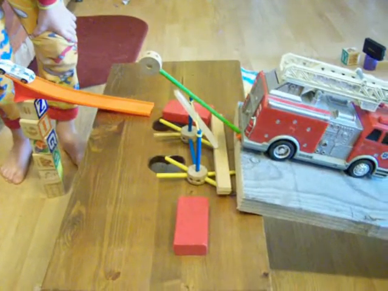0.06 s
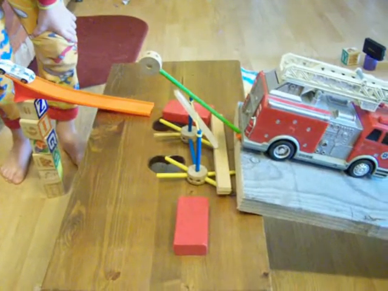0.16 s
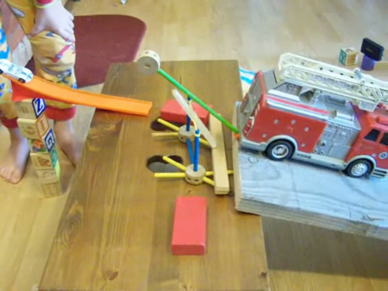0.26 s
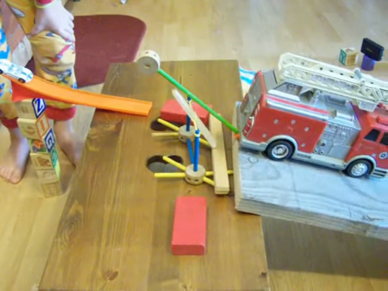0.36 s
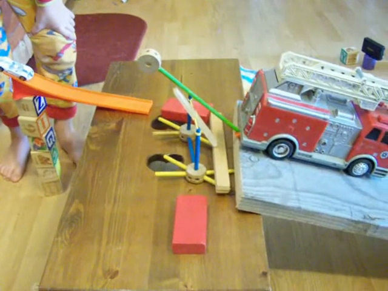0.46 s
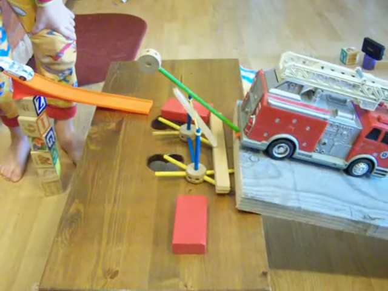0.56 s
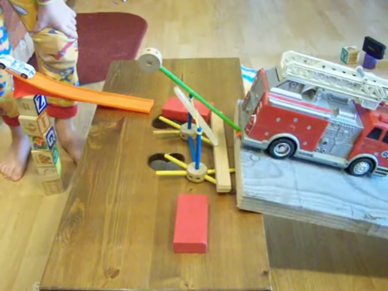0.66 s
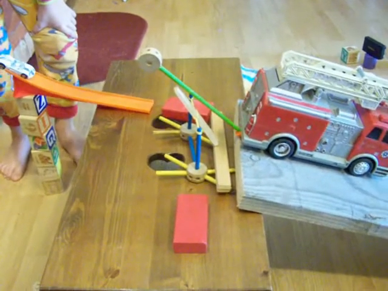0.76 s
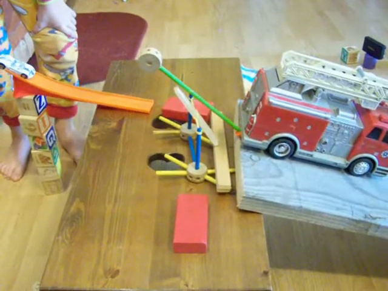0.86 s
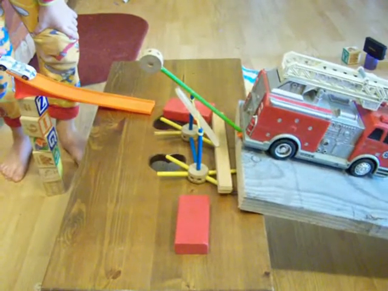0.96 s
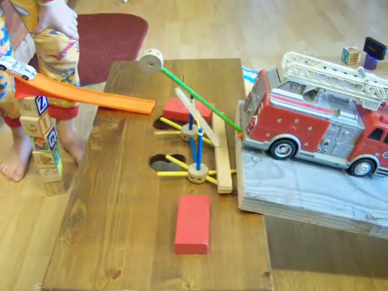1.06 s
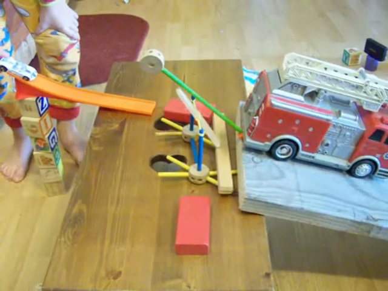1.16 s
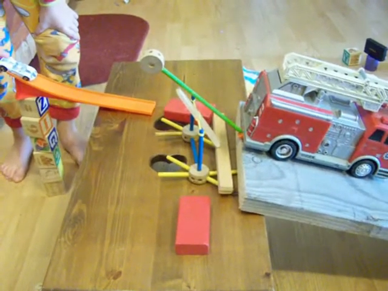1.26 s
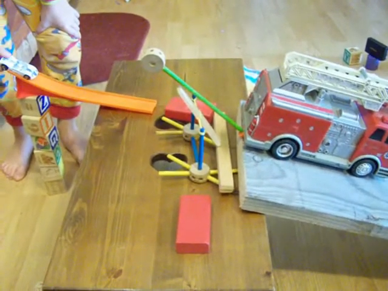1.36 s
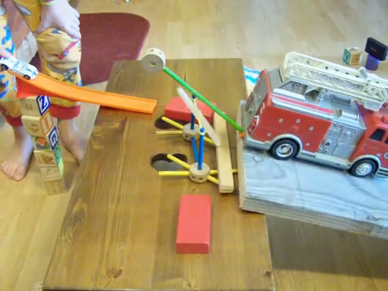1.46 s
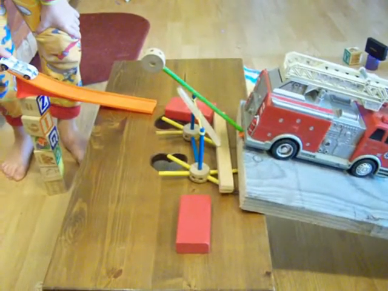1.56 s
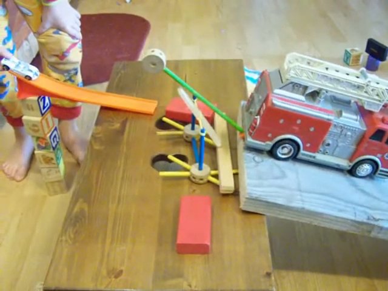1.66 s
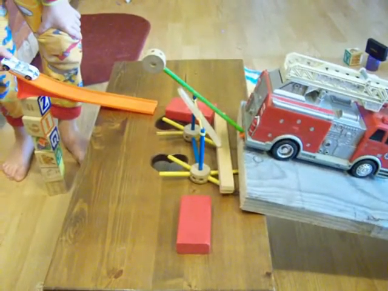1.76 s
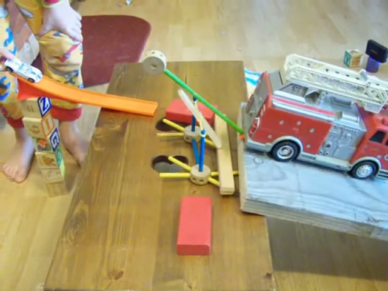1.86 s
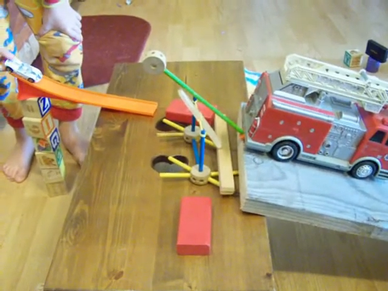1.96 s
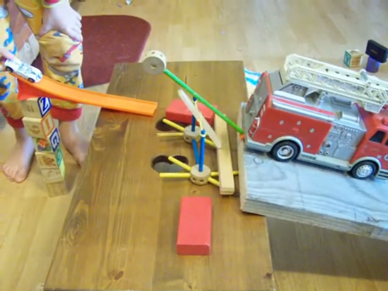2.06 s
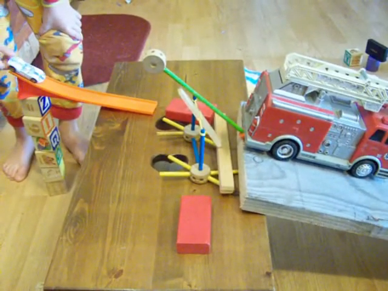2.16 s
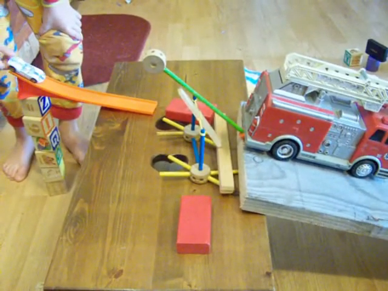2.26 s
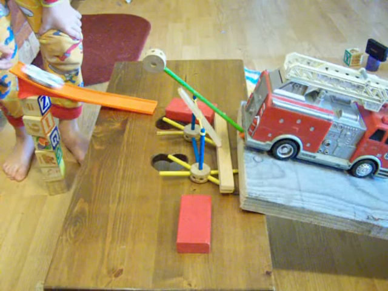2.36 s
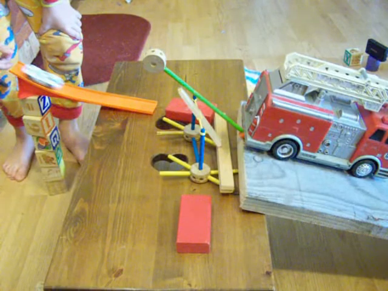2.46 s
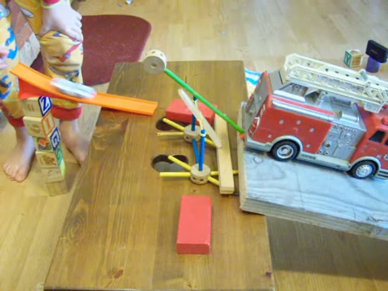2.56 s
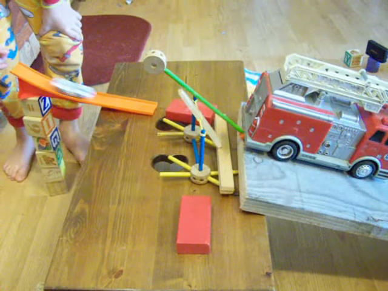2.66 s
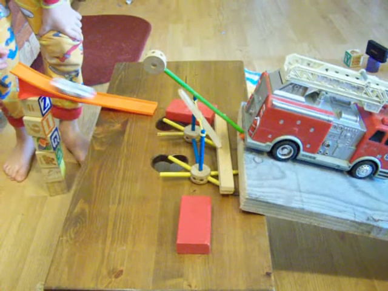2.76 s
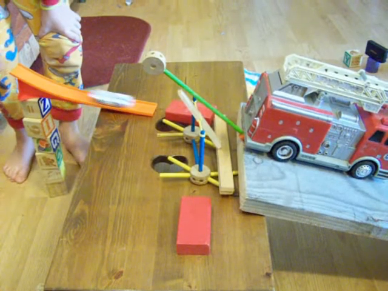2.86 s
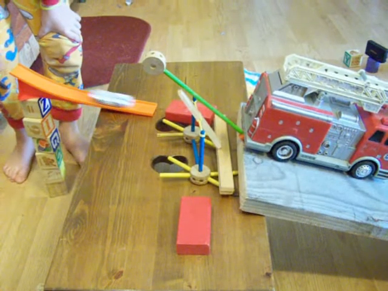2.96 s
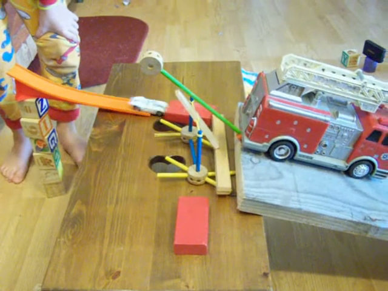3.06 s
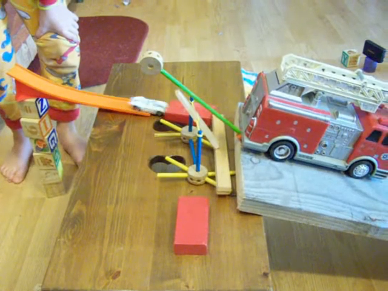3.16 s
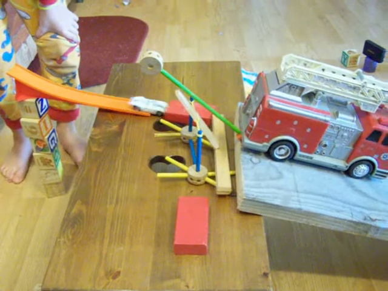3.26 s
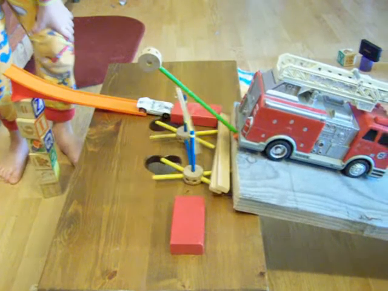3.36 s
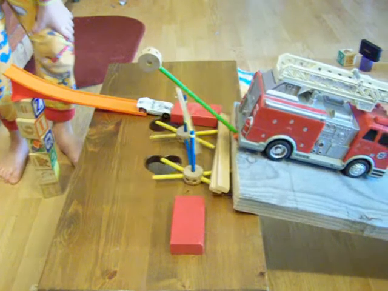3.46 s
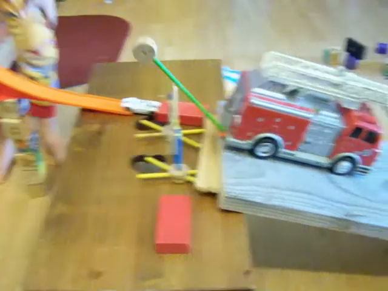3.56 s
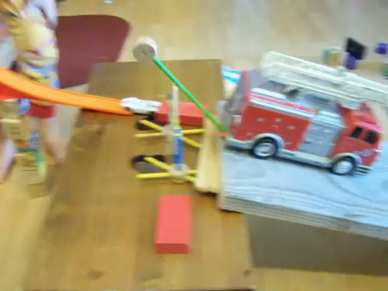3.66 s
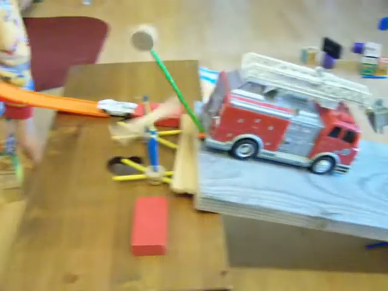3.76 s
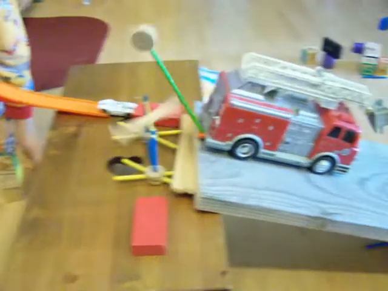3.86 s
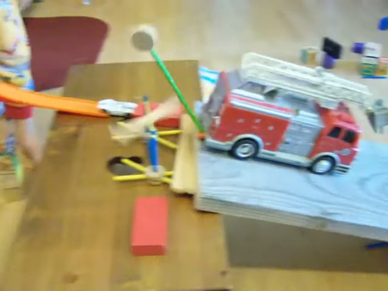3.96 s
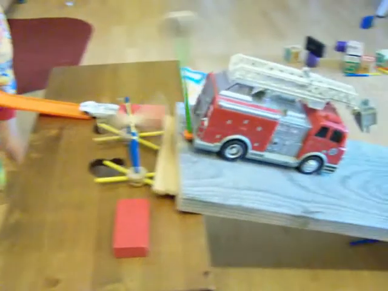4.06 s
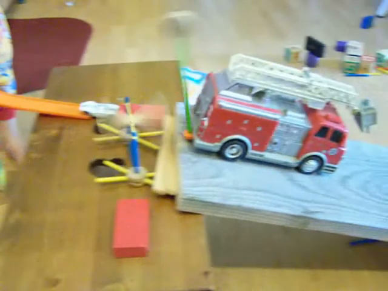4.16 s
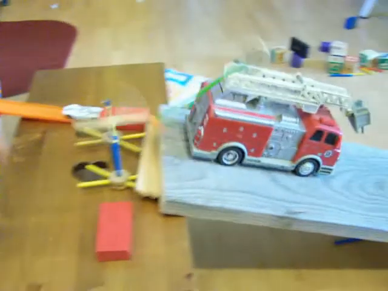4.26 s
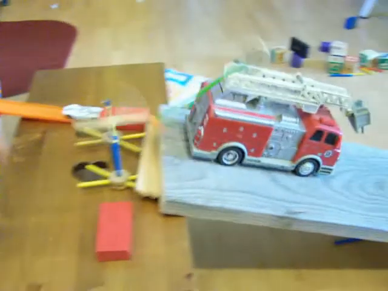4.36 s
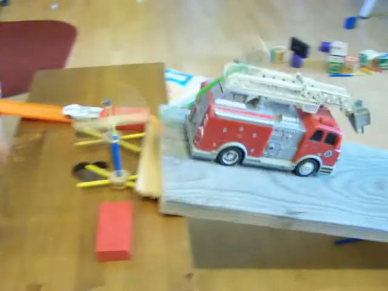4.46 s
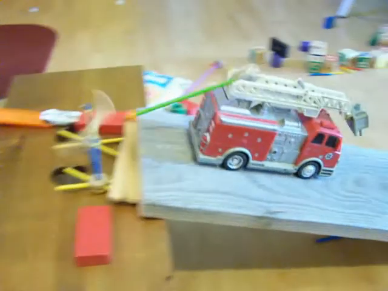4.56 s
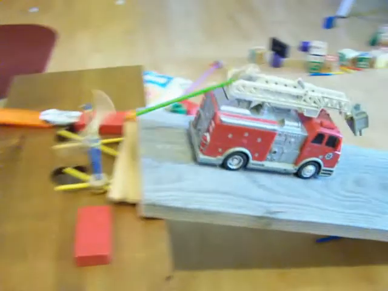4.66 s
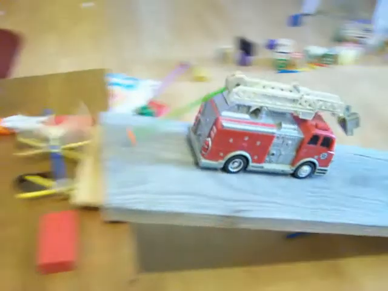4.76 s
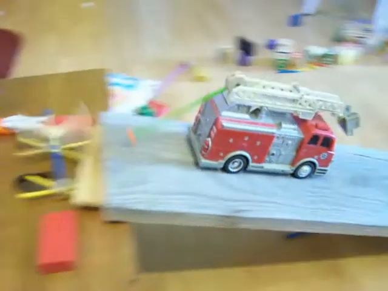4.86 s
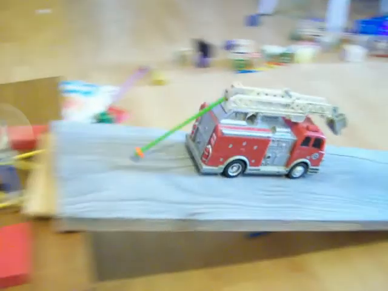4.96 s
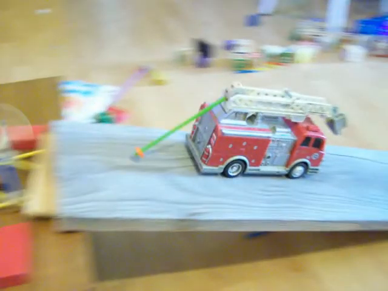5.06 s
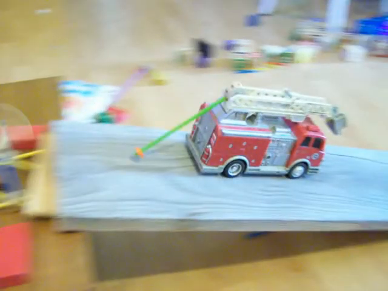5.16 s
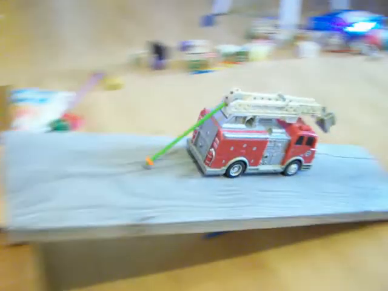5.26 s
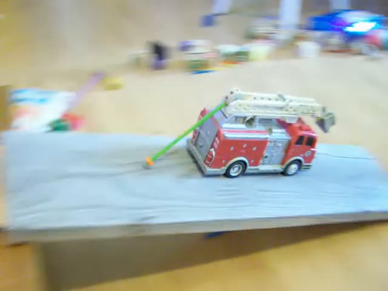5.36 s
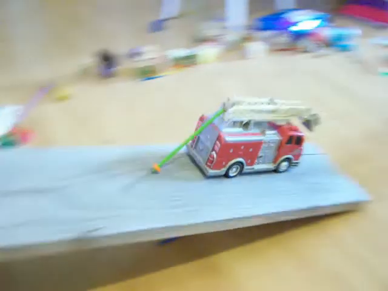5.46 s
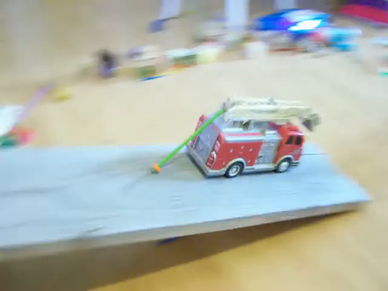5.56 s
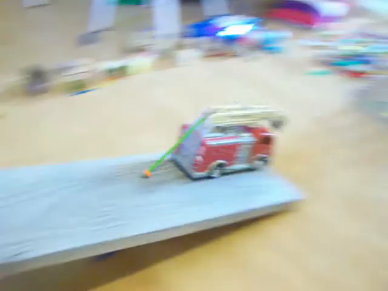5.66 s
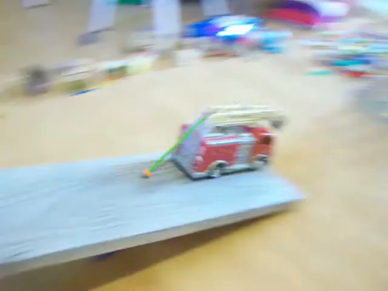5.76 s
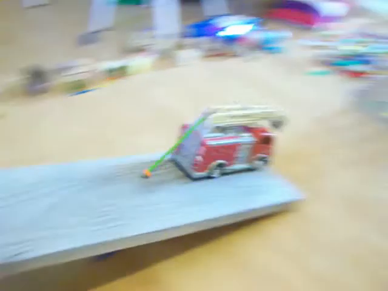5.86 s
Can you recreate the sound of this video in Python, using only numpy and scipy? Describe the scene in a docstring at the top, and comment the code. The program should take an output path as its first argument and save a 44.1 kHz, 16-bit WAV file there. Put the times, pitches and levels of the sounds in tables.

```python
"""Toys on a track, a table and a board

A quiet room with a low rumble and one hand-held recorder, its microphone hearing much more toy than room.
A toy car runs down a plastic track, knocks into a wooden block and slides out on the table; a stick spinner
trips, and a toy truck rattles down a wooden board. Random blows and clattering knocks shake ringing bodies.
The recorder keeps 6400 samples a second and joins them by straight lines: sounds are mirrored into the treble."""
import sys
import numpy as np
from scipy import signal
from scipy.fft import rfft, irfft
from scipy.io import wavfile
from scipy.ndimage import uniform_filter1d

SR = 44100
rng = np.random.default_rng(int(sys.argv[2]) if len(sys.argv) > 2 else 0)


def dump_mix(stems):
    """Bounce the given channels to the path in sys.argv[1] as a 16-bit WAV at rate SR."""
    frames = np.atleast_2d(stems).T  # one column per channel
    limited = np.clip(frames, -1, 1)  # hard clip at full scale
    pcm = np.round(limited * 32767).astype(np.int16)
    wavfile.write(sys.argv[1], SR, pcm)


N = 260618


def amp(db):
    """Gain of a level in dB."""
    return 10 ** (np.asarray(db) / 20)


def rms_one(x):
    """Signal scaled to rms 1."""
    return x / np.sqrt(np.mean(x ** 2) + 1e-20)


def add_at(out, s, sound):
    """Mix a sound into out from second s, cut off at the end."""
    at = round(s * SR)
    out[at:at + len(sound)] += sound[:N - at]


def levels(rows):
    """Gain curves of each dB column, straight in dB between rows, silent outside the table."""
    s, *columns = np.transpose(rows)
    t = np.arange(N) / SR
    inside = ((t > s[0]) & (t < s[-1])) * 1.
    inside = uniform_filter1d(inside, size=90)   # 2 ms edges avoid clicks
    return [inside * amp(np.interp(t, s, column)) for column in columns]


def ramp(start_s, end_s, start_db, db_per_s, hold_s=0.):
    """Gain that holds, then changes by a steady number of dB a second."""
    hold_end_s = start_s + hold_s
    end_db = start_db + db_per_s * (end_s - hold_end_s)
    return levels([(start_s, start_db), (hold_end_s, start_db), (end_s, end_db)])[0]


def drift(rate_hz):
    """Slow random wander of rms 1: noise through two equal one-pole lowpasses."""
    r = np.exp(-2 * np.pi * rate_hz / SR)
    slow = signal.lfilter([1], [1, -2 * r, r * r], rng.standard_normal(N + SR))
    return rms_one(slow[SR:])   # the first second lets the filter settle


def resonance(x, hz, width_hz):
    """Two-pole resonance with gain 1 on top; a narrower one rings longer."""
    r = np.exp(-np.pi * width_hz / SR)
    top = (1 - r * r) / 2
    return signal.lfilter([top, 0, -top], [1, -2 * r * np.cos(2 * np.pi * hz / SR), r * r], x)


def body(force, modes):
    """A solid body as resonances in parallel, signs alternating."""
    return sum((-1) ** k * amp(db) * resonance(force, hz, width_hz)
               for k, (hz, width_hz, db) in enumerate(modes))


def rolling(gain, modes, per_s, spread_db, bumpy_db, shift_db):
    """Moving contact meets grit and grain at random: uneven tiny blows, clumped by bumps, shake the body."""
    sizes = amp(spread_db * np.minimum(rng.exponential(1, N), 4)) * rng.choice([-1, 1], N)
    hits = rng.random(N) < per_s / SR
    blows = sizes * hits * amp(bumpy_db * drift(35)) + 1e-18
    on = np.flatnonzero(gain)
    near = slice(on[0], min(on[-1] + SR // 4, N))   # a quarter second more for the ring to die
    out, wander = np.zeros(N), drift(7.0)
    for k, mode in enumerate(modes):
        # the contact point wanders, so each resonance is driven now harder, now softer
        push = amp(shift_db * np.roll(wander, k * SR // 3))
        force = blows * gain * push + 1e-18
        out[near] += (-1) ** k * body(force[near], [mode])
    steady_rms = np.sqrt(np.mean(body(blows, modes) ** 2))
    return out / steady_rms


def knocks(rows, modes, clatter_s, ring_db, ring_width_hz, contact_hz):
    """Each knock is a dying clatter of contacts into the body, its own strongest ring and a low thud."""
    out, t = np.zeros(N), np.arange(SR // 6) / SR
    soft = np.exp(-2 * np.pi * contact_hz / SR)
    for s, peak_db, hz, thud_db in rows:
        force = rng.standard_normal(len(t)) * np.exp(-t / clatter_s)
        force[0] += 0.77 * np.sign(force[0])   # the first contact is harder
        # a yielding contact dulls the blow
        force = signal.lfilter([1], [1, -2 * soft, soft * soft], force)
        sound = rms_one(body(force, modes))
        sound += amp(ring_db) * rms_one(resonance(force, hz, ring_width_hz))
        sound += amp(thud_db) * rms_one(resonance(force, 637, 460))
        add_at(out, s, amp(peak_db) * sound / np.abs(sound).max())
    return out


def buzzes(rows, sag_per_s):
    """A narrow band of noise around a sinking pitch; quick start, soft end."""
    out = np.zeros(N)
    for s, length_s, level_db, hz, width_hz in rows:
        u = np.arange(round(length_s * 1.4 * SR)) / (length_s * SR)   # time in lengths
        r = np.exp(-np.pi * width_hz / SR)
        steady = 70 / width_hz   # the narrower the buzz, the more of it is a held tone
        wobble = signal.lfilter([1], [1, -r], rng.standard_normal((2, SR // 2)))
        wobble = wobble[:, -len(u):] * np.sqrt(1 - r * r)
        phase = 2 * np.pi * np.cumsum(hz * (1 - sag_per_s * u * length_s)) / SR
        tone = (steady + wobble[0]) * np.sin(phase) + wobble[1] * np.cos(phase)
        shape = np.clip(u * length_s / 0.0015, 0, 1) * np.clip((1.4 - u) / 0.57, 0, 1)
        add_at(out, s, amp(level_db) * shape * rms_one(tone))
    return out


# colour of the air in the room, relative: (frequency [Hz], density [dB per Hz])
AIR_COLOUR = [(12, -48), (20, -17.5), (87, -2.5), (112, -5), (150, -8), (216, -16), (245, -14.5),
              (359, -23), (383, -19.5), (494, -25.5), (624, -27), (771, -27), (1180, -28), (1280, -25.5),
              (3200, -37), (4160, -70), (7040, -120)]
# low bumps of the hand-held recorder: (time [s], level at the crest [dB])
HAND_BUMPS = [(2.71, -39), (3.89, -36), (4.15, -33), (4.45, -34), (5.03, -28), (5.43, -29)]


def room_tone():
    """Ventilation rumble and hiss, a faint whine, and low-band noise where hands bump the recorder."""
    hz = np.maximum(np.fft.rfftfreq(N, 1 / SR), 1)
    colour_hz, colour_db = np.transpose(AIR_COLOUR)
    colour = amp(np.interp(np.log(hz), np.log(colour_hz), colour_db))
    air = amp(-39.5) * rms_one(irfft(rfft(rng.standard_normal(N)) * colour, N))
    whine = amp(-61) * rms_one(resonance(rng.standard_normal(N), 1235, 9.1))
    low_band = signal.butter(2, [25, 100], "band", fs=SR, output="sos")
    low = rms_one(signal.sosfilt(low_band, rng.standard_normal(N)))
    t = np.arange(N) / SR
    hands = sum(amp(db - 148 * np.abs(t - s)) for s, db in HAND_BUMPS)   # 148 dB/s on both sides
    return air + whine + hands * low


# resonances of the plastic track: (frequency [Hz], width [Hz], relative level [dB])
TRACK_MODES = [(597, 188, -6), (856, 200, -9.5), (1100, 130, -6.5), (1310, 110, -1.5), (1455, 140, 0),
               (1790, 250, -2.5), (2065, 240, -7.5), (2380, 300, -16.5), (2880, 190, -19.5)]
# car knocking on the track: (time [s], peak [dB], strongest ring [Hz], thud against body sound [dB])
CAR_HITS = [(1.287, -41, 2000, -20), (1.759, -25, 1360, 0), (1.785, -32, 1300, -11),
            (2.072, -17, 1370, -23), (2.15, -21, 1970, -20), (2.259, -24.5, 2300, -12),
            (2.39, -21, 2360, -20)]


def car():
    """Knocks and wheels shake the plastic track; the wheels swell as the car gathers speed."""
    wheels = ramp(start_s=2.076, end_s=2.7, start_db=-30, db_per_s=6)
    out = rolling(wheels, TRACK_MODES, per_s=1600., spread_db=-0.5, bumpy_db=2.0, shift_db=2.5)
    return out + knocks(CAR_HITS, TRACK_MODES, clatter_s=0.0083, ring_db=9.0, ring_width_hz=210, contact_hz=3500)


# whine of a car wheel: (time [s], length [s], level [dB], pitch [Hz], width [Hz])
WHEEL_WHINE = [(2.535, .14, -26.5, 1489, 27)]


def wheel_whine():
    """A wheel whines before the crash, its pitch sinking at 65 % of its start a second."""
    return buzzes(WHEEL_WHINE, sag_per_s=.65)


# resonances of the wooden block, the lowest two also for the table: (frequency [Hz], width [Hz], relative level [dB])
BLOCK_MODES = [(259, 95, -8.5), (500, 170, -9.5), (670, 210, -8), (933, 28, 2.5), (1035, 79, -1.5),
               (1240, 370, -5.5), (1567, 92, 4.5), (1684, 147, 0), (1894, 440, -6.5), (2273, 88, -7.5),
               (2410, 160, -17)]
# knocks on the block: (time [s], peak [dB], strongest ring [Hz], thud against body sound [dB])
BLOCK_HITS = [(2.705, 7.5, 890, 18), (2.711, 5.5, 1570, -2.5), (2.912, -8, 2113, -26),
              (3.306, -20, 1520, -9), (3.505, -33.5, 2310, -20)]


def block_knocks():
    """The struck block rings in its wooden resonances."""
    return knocks(BLOCK_HITS, BLOCK_MODES, clatter_s=0.0048, ring_db=7.0, ring_width_hz=94, contact_hz=3680)


# brief buzzes, mostly single parts, one a low hum at 87 Hz: (time [s], length [s], level [dB], pitch [Hz],
# width [Hz])
BRIEF_BUZZES = [(2.716, 0.054, -23.5, 1000, 48), (2.83, 0.045, -20, 915, 44),
                (2.833, 0.026, -19.5, 1582, 88), (2.906, .011, -12, 1600, 150),
                (3.385, .018, -41, 2490, 110), (3.733, 0.033, -29.5, 860, 130),
                (3.855, 0.066, -26.5, 87, 13), (3.928, 0.054, -21.5, 1010, 12),
                (3.939, 0.24, -28.5, 2476, 16), (3.96, 0.15, -29, 1550, 25), (4.051, 0.031, -22, 1004, 25),
                (4.146, 0.025, -22, 1006, 31), (4.217, .1, -22, 369, 31), (4.5, 0.033, -23, 350, 37),
                (4.551, .058, -23, 1780, 32), (4.588, 0.036, -20, 1150, 20), (4.836, 0.036, -21.5, 1150, 65),
                (4.838, 0.012, -14, 1820, 45), (5.497, 0.022, -16, 2270, 510),
                (5.664, 0.041, -21.5, 625, 18)]


def chatter():
    """Brief buzzes, mostly of single parts, each a narrow band of noise sinking very slightly; one is a low
    hum."""
    return buzzes(BRIEF_BUZZES, sag_per_s=0.0496)


# the spinner tips against the table before it trips: (time [s], table rumble [dB], rattle [dB])
SPINNER_TIPPING = [(3.73, -45, -40), (3.79, -38, -40), (3.84, -30.5, -37)]


def table_contacts():
    """Car and block slide out, steady, then fading as they slow; the spinner tips against the table."""
    table, rattle = levels(SPINNER_TIPPING)
    table = table + ramp(2.76, 3.73, start_db=-31.5, db_per_s=-45.5, hold_s=0.2)
    rattle = rattle + ramp(2.76, 3.73, start_db=-22, db_per_s=-32, hold_s=0.16)
    out = rolling(rattle, BLOCK_MODES[2:], per_s=1500., spread_db=1.0, bumpy_db=-0.3, shift_db=0.5)
    return out + rolling(table, BLOCK_MODES[:2], per_s=900., spread_db=3.0, bumpy_db=3.4, shift_db=4.0)


# resonances of the sticks, the truck and its small loose parts: (frequency [Hz], width [Hz], relative level [dB])
STICK_MODES = [(740, 360, -12), (986, 39, 3.5), (1120, 120, -5), (1544, 190, 2.5), (1890, 244, 4),
               (2050, 410, -0.5), (2482, 79, 3), (3000, 140, -12.5)]
TRUCK_MODES = [(946, 210, 1.2), (1148, 71, 6.3), (1272, 204, 2.9), (1566, 183, 6.25), (1800, 107, 0.59)]
LOOSE_MODES = [(2035, 220, -9.5), (2270, 340, -9.5), (2530, 550, -16), (2920, 150, -16)]
# knocks of the tripping spinner: (time [s], peak [dB], strongest ring [Hz], thud against body sound [dB])
STICK_HITS = [(3.82, -18, 1800, -12), (3.843, 6, 1990, 2.5), (3.852, -0.5, 1520, 0), (3.923, 6, 1675, -9)]


def spinner():
    """Sticks knock, ringing the truck's resonances, then rub as they whirl, swelling."""
    out = knocks(STICK_HITS, TRUCK_MODES + LOOSE_MODES,
                 clatter_s=0.0054, ring_db=5.5, ring_width_hz=230, contact_hz=3030)
    rubbing = ramp(start_s=3.94, end_s=4.225, start_db=-21, db_per_s=10)
    return out + rolling(rubbing, STICK_MODES, per_s=1700.0, spread_db=0.5, bumpy_db=-1.6, shift_db=0.6)


# resonances of the wooden board: (frequency [Hz], width [Hz], relative level [dB])
BOARD_MODES = [(132, 88, -13.5), (258, 67, -7), (378, 81, -3), (475, 95, -1), (596, 87, 3.5),
               (732, 126, -0.5)]
# the truck lurches free, creeps, then rolls; the lowest board modes and loose parts get a further trim:
# (time [s], board rumble [dB], body rattle [dB])
TRUCK_LEVELS = [(3.855, -20.5, -15), (3.89, -24, -21.5), (3.925, -30.5, -15), (3.945, -39.5, -42),
                (4.2, -26, -28), (4.23, -24.5, -19), (4.4, -22, -20.5), (4.62, -22.5, -21),
                (4.9, -26, -26.5), (5.05, -21.5, -26), (5.11, -19.5, -14.5), (5.24, -23, -17.5),
                (5.48, -22.5, -20), (5.62, -24, -18.5), (5.76, -27, -23), (5.91, -28, -23)]
# knocks of the truck: (time [s], peak [dB], strongest ring [Hz], thud against body sound [dB])
TRUCK_HITS = [(4.247, -13, 1550, -4), (4.274, -7, 1390, -22), (4.299, -3, 1896, -20), (4.422, -6, 1570, 5),
              (4.552, -6.5, 1830, -31), (4.588, -11, 1100, -20), (4.674, -9, 1370, 0),
              (4.837, -2.5, 1155, -20), (5.052, -4, 1470, -6), (5.062, -8.5, 1447, -24),
              (5.091, -2.5, 1390, -20), (5.1, 0, 1380, 3), (5.135, -8.5, 940, -10), (5.208, -6, 1300, -15),
              (5.361, 2.5, 1522, -3), (5.488, -8, 1520, -5), (5.535, -8.5, 1450, 7), (5.587, -0.5, 1365, 3),
              (5.864, -11.5, 1460, -11)]


def truck():
    """Wheels shake the board, the body rattles, its small parts shake along, and knocks ring them."""
    rumble, rattle = levels(TRUCK_LEVELS)
    rolled_s = np.arange(N) / SR - 4.225
    deep = rumble * amp(-0.5 - 2.5 * rolled_s)   # lowest modes thin out towards the foot of the board
    loose = rattle * amp(-18.5 + 3.5 * rolled_s)   # small parts shake more as the truck speeds up
    out = rolling(deep, BOARD_MODES[:3], per_s=900., spread_db=2.5, bumpy_db=1.2, shift_db=1.5)
    out += rolling(rumble, BOARD_MODES[3:], per_s=900., spread_db=2.5, bumpy_db=1.2, shift_db=1.8)
    out += rolling(rattle, TRUCK_MODES, per_s=1200., spread_db=1.0, bumpy_db=0.53, shift_db=1.4)
    out += rolling(loose, LOOSE_MODES, per_s=920.0, spread_db=-1.0, bumpy_db=0.8, shift_db=3.5)
    return out + knocks(TRUCK_HITS, TRUCK_MODES + LOOSE_MODES,
                        clatter_s=0.0041, ring_db=3.5, ring_width_hz=78, contact_hz=2500)


# dry ticks of the trailing stick: (time [s], peak [dB], pitch [Hz], width of each pass [Hz])
TRAILING_TICKS = [(5.7695, 0, 1400, 880), (5.8036, 0.7, 1600, 764)]


def stick_ticks():
    """One sharp contact each, a cycle or two long: a click twice through a wide resonance."""
    out, click = np.zeros(N), signal.unit_impulse(SR // 50)
    for s, peak_db, hz, width_hz in TRAILING_TICKS:
        sound = -resonance(resonance(click, hz, width_hz), hz, width_hz)
        add_at(out, s, amp(peak_db) * sound / np.abs(sound).max())
    return out


def room(x):
    """A noise tail falling 60 dB in 0.25 s, starting with the first wall after 4 ms."""
    t = np.arange(SR // 2) / SR
    tail = rng.standard_normal(len(t)) * amp(-60 * t / .25) * (t > .004)
    tail /= np.sqrt(np.sum(tail ** 2))
    return amp(-12) * signal.fftconvolve(x, tail)[:N]


def scene():
    """All toys in the room."""
    toys = car() + wheel_whine() + block_knocks() + chatter() + table_contacts()
    toys += spinner() + truck() + stick_ticks()
    return (toys + room(toys) + room_tone())[None]


def record(dry):
    """Band limit, overload, sparse samples joined by straight lines, top cut."""
    samples_per_s = 6400
    t = np.arange(N) / SR
    band = signal.sosfilt(signal.butter(4, 2900, fs=SR, output="sos"), dry[0])
    kept_s = np.arange(0, N / SR + 1 / samples_per_s, 1 / samples_per_s)
    samples = np.clip(np.interp(kept_s, t, band), -1.05, 1.05)
    lines = np.interp(t, kept_s, samples)   # the corners mirror the sound into the treble
    top_cut = signal.cheby2(14, 85, 16600, fs=SR, output="sos")
    return signal.sosfilt(top_cut, lines)[None]


dry = scene()
out = record(dry)
dump_mix(out)
```